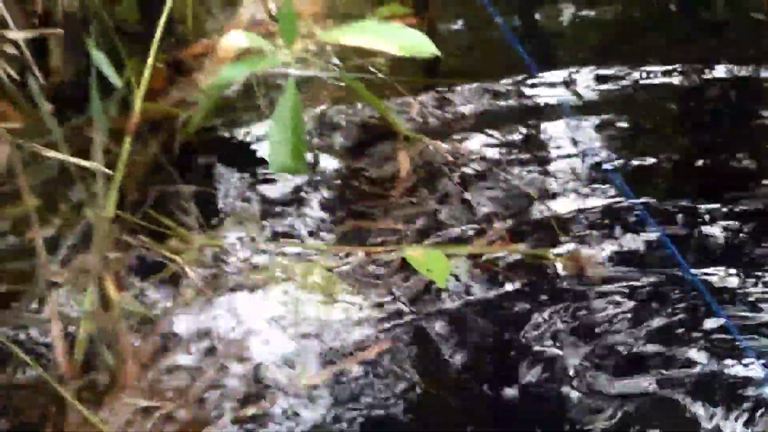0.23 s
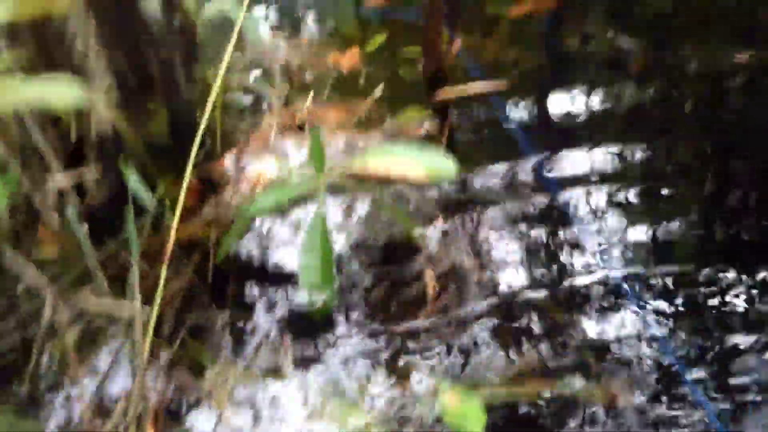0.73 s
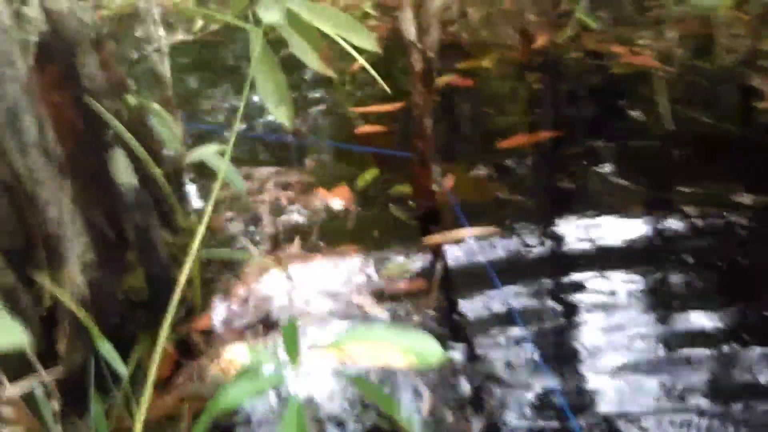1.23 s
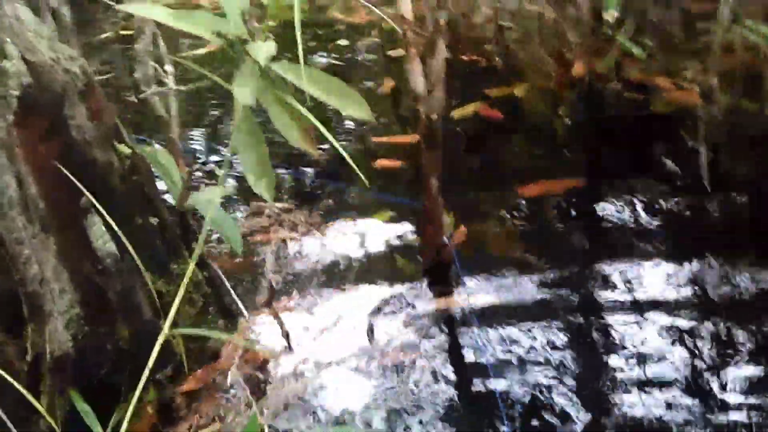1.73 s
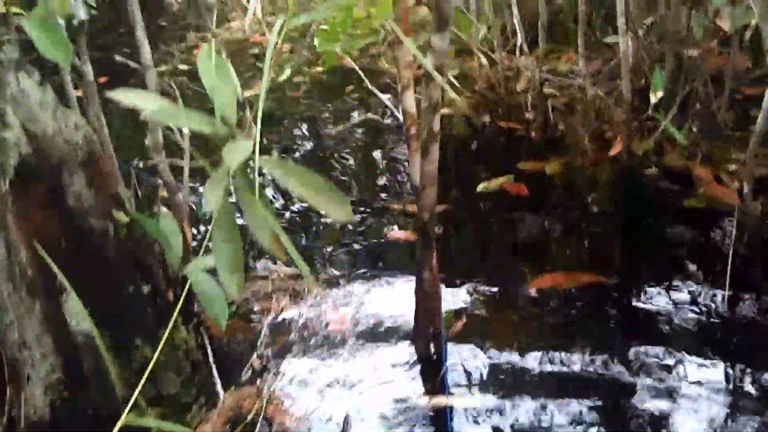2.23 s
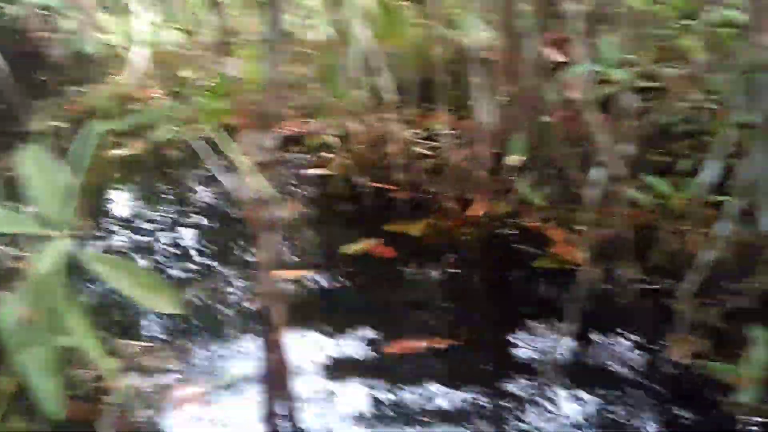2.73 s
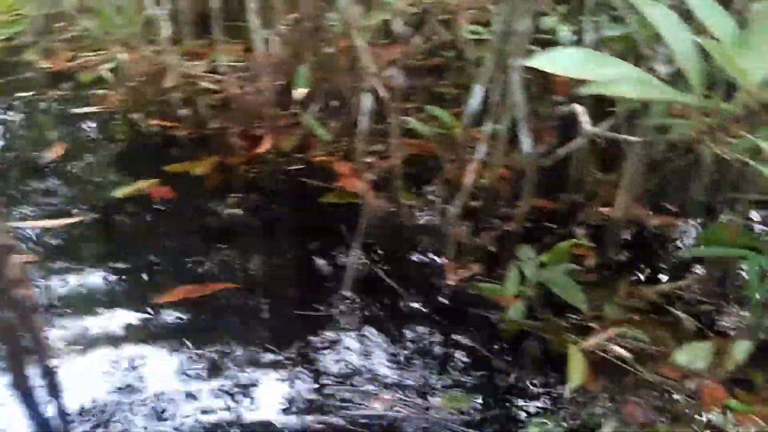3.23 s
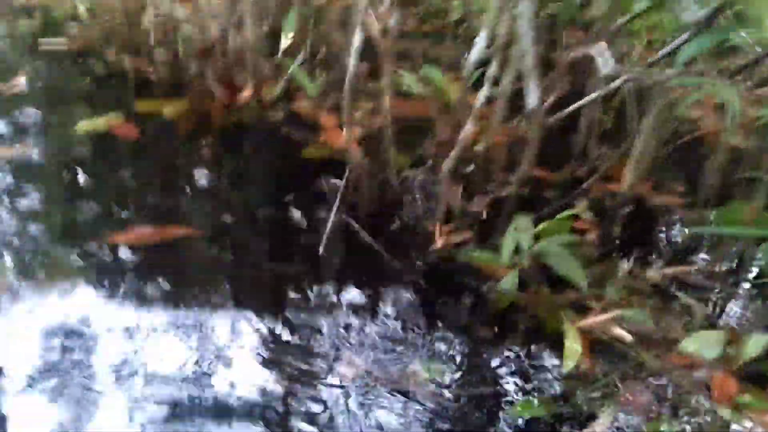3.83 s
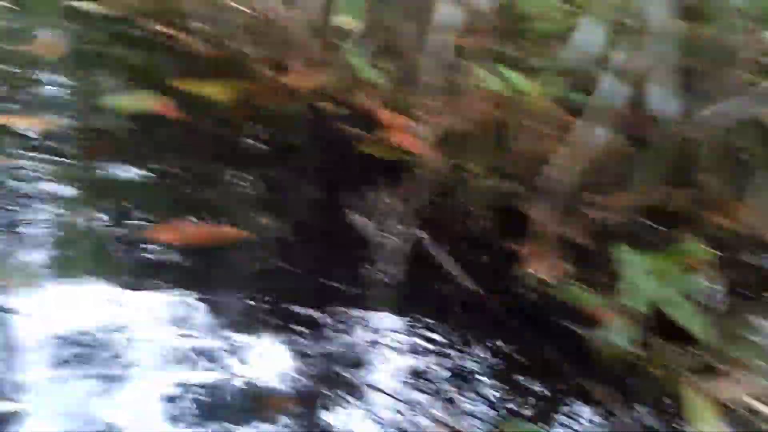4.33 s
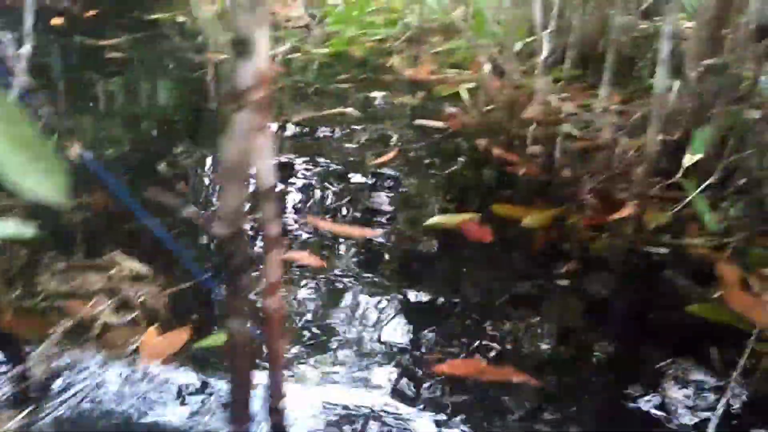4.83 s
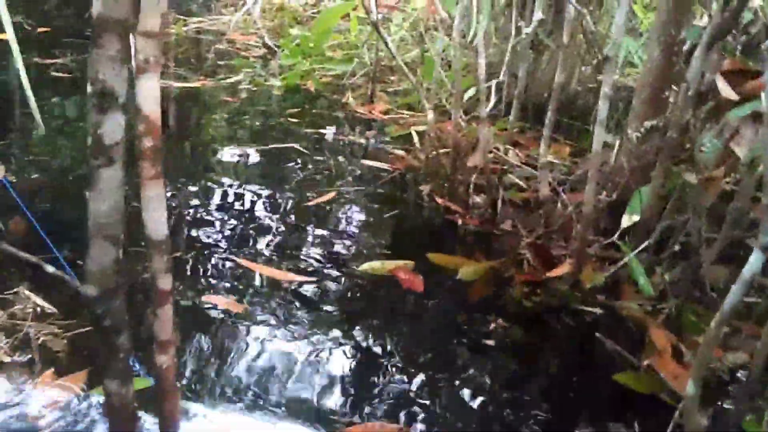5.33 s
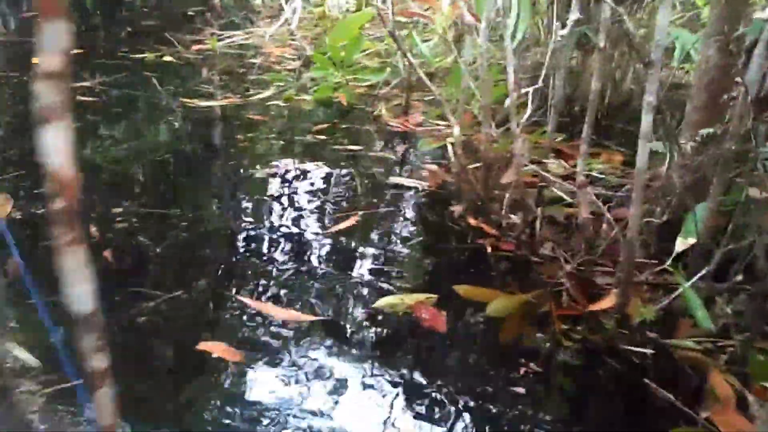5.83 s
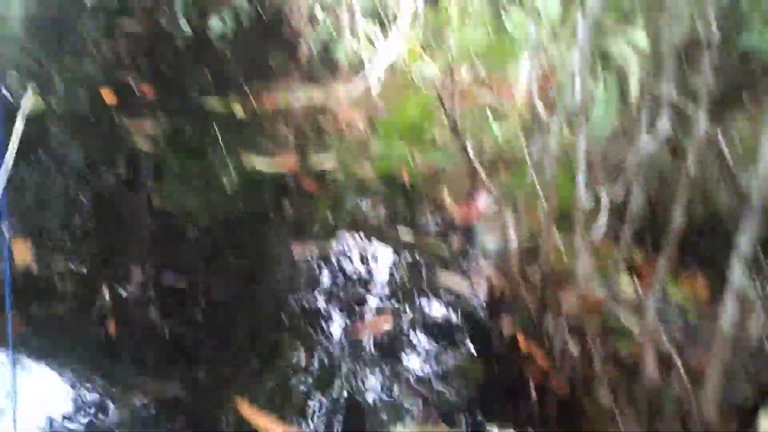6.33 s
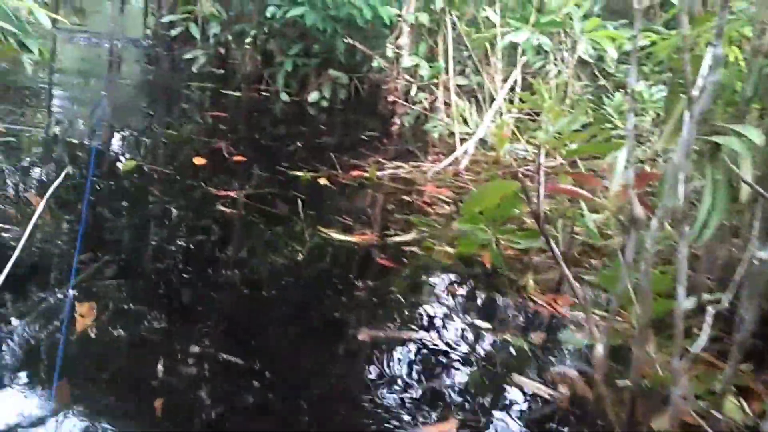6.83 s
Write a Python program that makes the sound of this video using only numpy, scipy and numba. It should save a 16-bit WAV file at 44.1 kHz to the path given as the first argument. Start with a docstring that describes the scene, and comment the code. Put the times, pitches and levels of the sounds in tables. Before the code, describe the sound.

Close splashing through shallow swamp water, with bubbly gurgles and fizzing spray, a near-silent pause around two seconds, then sharp slaps and more irregular sloshing.

```python
"""Something moves through shallow swamp water a step away, over a nearly silent swamp.
At first come ringing air pockets, then surges of bubbles and spray with slaps on the surface.
Near two seconds the water falls almost still; plunging slaps then break the pause and splashing runs on.
Air pockets are gliding, dying sines, bubble clouds sum thousands of them, and slaps are shaped noise.
Now and then wet reeds rustle as sliding noise bands; trunks and reeds scatter the sound a little."""
import sys
import numpy as np
from scipy import signal
from scipy.fft import rfft, irfft
from scipy.io import wavfile
from scipy.ndimage import uniform_filter1d
from numba import njit

SR = 44100
rng = np.random.default_rng(int(sys.argv[2]) if len(sys.argv) > 2 else 0)


def unload_wav(signal):
    """Save mono or channel-first audio to the path in sys.argv[1] as 16-bit WAV at rate SR, clipped to [-1, 1]."""
    wavfile.write(
        sys.argv[1],
        SR,
        np.round(np.clip(np.atleast_2d(signal).T, -1, 1) * 32767).astype(np.int16),
    )


N = 312220


def from_db(db):
    """Decibel law: gain is ten to the power of level over twenty."""
    return 10 ** (np.asarray(db) / 20)


def rms_one(x):
    """Normalisation: scale to a root mean square of 1."""
    return x / np.sqrt(np.mean(x ** 2) + 1e-20)


def in_time(rows):
    """Linear interpolation: each column of a time table at every sample."""
    s, *columns = np.transpose(rows)
    return [np.interp(np.arange(N) / SR, s, column) for column in columns]


def colour(x, spectrum):
    """Minimum-phase filtering: a folded cepstrum makes the (frequency [Hz], level [dB]) shape causal."""
    size = 8192
    hz, db = np.transpose(spectrum)
    grid = np.maximum(np.arange(size // 2 + 1) * SR / size, 1)
    gain = from_db(np.interp(np.log(grid), np.log(hz), db))
    cepstrum = irfft(np.log(gain))
    fold = np.r_[1, np.full(size // 2 - 1, 2), np.zeros(size // 2)]
    response = irfft(np.exp(rfft(cepstrum * fold)))[:size // 2]
    return signal.oaconvolve(np.atleast_2d(x), response[None], axes=-1)[:, :N]


def add(track, s, sound):
    """Superposition: mix a sound into a track from time s on."""
    start = int(np.clip(round(s * SR), 0, N - 1))
    track[..., start:start + sound.shape[-1]] += sound[..., :N - start]


def steady(x, window_s):
    """Short-time power normalisation: even out the slow level and keep the grain."""
    size = max(int(window_s * SR), 1)
    power = np.mean(x ** 2, axis=0)
    power = uniform_filter1d(uniform_filter1d(power, size), size)
    return x / np.sqrt(np.maximum(power, 1e-9))


# diffuse over common sound: (frequency [Hz], level ratio [dB])
DIFFUSENESS = [(60, -7), (400, -7), (1000, -7), (2500, 4), (5000, -2), (12000, 1)]


def wide_noise():
    """Interaural coherence: stereo noise more alike at both ears in the bass, more diffuse higher up."""
    diffuse = colour(rng.standard_normal((2, N)), DIFFUSENESS)
    even = [(hz, -10 * np.log10(1 + from_db(db) ** 2)) for hz, db in DIFFUSENESS]   # total stays flat
    return colour(rng.standard_normal(N) + diffuse, even)


# spectrum of the faint swamp air: (frequency [Hz], relative level [dB per Hz])
AIR_SPECTRUM = [(18, -57), (30, -6.5), (44, -1), (65, -8.5), (98, -19.5), (456, -43.5), (670, -8),
                (1010, -72.5), (1710, -17), (3450, -23), (3710, -27.5), (5720, -30.5), (6770, 2),
                (7450, -52), (9480, -23.5), (12300, -74), (20900, -120)]
AIR_DB = -76.5
# narrow high hisses, perhaps far insects: (frequency [Hz], width [Hz], level [dB])
HISS_BANDS = [(6900, 10, -78.5), (3850, 20, -91)]
# swell of the upper hiss: (time [s], level change [dB])
UPPER_HISS_SWELL = [(0, -5), (1.6, 1.5), (2.099, -8), (2.6, -1.5), (4.3, 7.5), (7.08, 7)]


def background():
    """Coloured and resonant noise: faint swamp air with two narrow bands of high hiss."""
    out = from_db(AIR_DB) * rms_one(colour(rng.standard_normal((2, N)), AIR_SPECTRUM))
    swells_db = (in_time(UPPER_HISS_SWELL)[0], 0)   # the lower band is steady
    for (hz, width, db), swell_db in zip(HISS_BANDS, swells_db):
        resonance = signal.iirpeak(hz, hz / width, fs=SR)
        hiss = signal.lfilter(*resonance, rng.standard_normal((2, N)))
        out += from_db(db + swell_db) * rms_one(hiss)
    return out


# low rumble as the microphone is moved about: (time [s], level [dB])
RUMBLE_LEVEL = [(0, -76), (2.5, -82.5), (2.75, -73), (3.3, -76), (3.9, -76.5), (4.4, -71), (4.65, -75),
                (5.1, -60), (5.35, -74), (5.8, -61), (6.2, -67.5), (6.5, -73.5), (6.78, -59), (7.08, -66)]
# its spectrum: (frequency [Hz], relative level [dB per Hz])
RUMBLE_SPECTRUM = [(20, -40.5), (45, -16), (75, -12.5), (120, -19), (200, -26), (400, -41.5)]


def rumble():
    """Amplitude modulation: dull low noise that swells while the microphone moves."""
    level_db, = in_time(RUMBLE_LEVEL)
    return from_db(level_db) * rms_one(colour(wide_noise(), RUMBLE_SPECTRUM))


# bright rustles, as of wet reeds being brushed:
# (start [s], length [s], level before the swell [dB], first frequency [Hz], last frequency [Hz])
BRUSHES = [(4.163, 0.066, -43.5, 3810, 3830), (4.521, 0.22, -42.5, 2180, 3220),
           (4.728, .1, -34.5, 3624, 4010), (4.779, 0.068, -37.5, 5010, 5240),
           (5.109, 0.062, -50, 7100, 6930), (5.547, 0.05, -43.5, 5780, 5770),
           (5.957, 0.064, -50, 5000, 4470), (6.795, 0.084, -36, 4970, 4870)]
BRUSH_WIDTH = 0.16   # bandwidth as a share of the first frequency


def rustle():
    """Quadrature modulation: each brush is a noise band that swells, slides in pitch and fades."""
    out, t = np.zeros((2, N)), np.arange(SR // 4) / SR
    for s, length, db, first_hz, last_hz in BRUSHES:
        gone = np.minimum(t / length, 1)
        turn = 2 * np.pi * np.cumsum(first_hz + (last_hz - first_hz) * gone) / SR
        narrow = signal.butter(2, BRUSH_WIDTH * first_hz / 2, fs=SR, output="sos")
        a, b = signal.sosfilt(narrow, rng.standard_normal((2, 2, len(t))))
        band = rms_one(a * np.cos(turn) + b * np.sin(turn))
        add(out, s, from_db(db) * np.sin(np.pi * gone ** 0.51) * band)
    return out


# each push through the water:
# (start [s], swell [s], hold [s], spray level [dB], gurgle level [dB], slosh level [dB])
SURGES = [(0.103, 0.063, 0.01, -56.5, -74, -85), (0.197, 0.046, 0.011, -50.5, -70.5, -85),
          (0.293, 0.036, 0.076, -42.5, -46.5, -91.5), (0.4, 0.066, 0.18, -35.5, -36, -81),
          (0.629, 0.069, 0.06, -38.5, -40, -86.5), (0.749, .03, 0.14, -37, -48, -77),
          (0.964, 0.043, 0.17, -40.5, -45, -78.5), (1.366, 0.023, 0.078, -59, -60.5, -78.5),
          (1.648, 0.01, 0.086, -66, -60, -75.5), (2.586, .04, 0.039, -59.5, -49.5, -69),
          (2.692, 0.0085, 0.06, -52, -51, -45.5), (2.764, 0.0046, 0.031, -43, -50, -45.5),
          (2.829, 0.086, 0.0095, -45, -67, -80.5), (2.954, 0.036, 0.0039, -47, -66, -53.5),
          (3.096, 0.014, 0.0073, -43, -60, -43.5), (3.17, 0.036, 0.01, -41.5, -60.5, -59),
          (3.271, 0.024, 0.042, -36.5, -44, -75.5), (3.473, 0.049, 0.019, -54.5, -45, -69),
          (3.626, 0.024, 0.014, -45.5, -49.5, -60.5), (3.699, 0.0075, 0.012, -50.5, -52, -61),
          (3.838, 0.039, 0.058, -68.5, -55, -75), (4.127, 0.068, .025, -44.5, -51, -57),
          (4.41, 0.083, 0.23, -42, -49.5, -63.5), (4.532, 0.084, 0.03, -55.5, -39.5, -46.5),
          (4.69, 0.067, 0.052, -41.5, -49, -51.5), (4.876, 0.052, 0.092, -43, -50.5, -53.5),
          (5.352, 0.074, 0.06, -64, -64.5, -84), (5.549, 0.0062, 0.0098, -43.5, -49.5, -65),
          (5.65, 0.067, 0.011, -55.5, -43.5, -65.5), (5.776, .028, 0.013, -41, -48.5, -60.5),
          (5.933, 0.07, 0.01, -54.5, -52, -64), (6.077, 0.019, 0.0084, -56, -56, -59.5),
          (6.169, 0.0027, 0.0025, -54.5, -58.5, -59), (6.277, 0.016, 0.013, -51.5, -60.5, -80.5),
          (6.573, 0.098, 0.057, -51, -45.5, -83), (6.729, 0.019, 0.027, -45.5, -44.5, -50),
          (6.751, 0.089, 0.02, -42, -39.5, -56.5), (6.924, .05, 0.032, -39.5, -47.5, -55),
          (7.019, 0.038, .05, -34.5, -36.5, -58)]
SWELL_DB = 18   # climb during the swell
# for spray, gurgle, slosh: rate of collapse, then the trickle left behind, and the water's lowest level
COLLAPSE_DB_PER_S = (208, 233.5, 329.5)
TRICKLE_DB, TRICKLE_DB_PER_S = (-11.5, -11, -13.5), 39.5
CALM_DB = (-84, -91.5, -88.5)


def stirring():
    """Power summation: levels [dB] of surges that swell, hold, collapse and trickle away."""
    t = np.arange(0, N / SR + .002, .001)
    collapse, trickle, calm = (np.array(c)[:, None] for c in (COLLAPSE_DB_PER_S, TRICKLE_DB, CALM_DB))
    power = from_db(calm) ** 2
    for start, swell, hold, *levels in SURGES:
        rising = SWELL_DB * np.minimum((t - start) / swell - 1, 0)
        after = np.maximum(t - start - swell - hold, 0)
        falling = np.maximum(-collapse * after, trickle - TRICKLE_DB_PER_S * after)
        power = power + from_db(np.array(levels)[:, None] + rising + falling) ** 2
    return in_time(np.column_stack([t, *(10 * np.log10(power))]))


@njit
def ring_bubbles(starts, steps, lengths, sizes, rises, total):
    """Damped oscillation: a sum of dying sines, each rising in pitch as its bubble nears the surface."""
    out = np.zeros(total)
    for k in range(len(starts)):
        height, fade = sizes[k], np.exp(-np.log(1000) / lengths[k])   # 60 dB over the length
        for i in range(min(int(lengths[k]), total - starts[k])):
            swell = min(1., 16 * i / lengths[k])   # the ring builds up over the first sixteenth
            phase = steps[k] * i * (1 + rises[k] * i / lengths[k] / 2)
            out[starts[k] + i] += swell * height * np.sin(phase)
            height *= fade
    return out


BRISK_DB, THINNING = -42, .7   # below a brisk stir the birth rate falls as the level to this power
CALM_RING = .25   # bubbles ring longer in calm water: cycles fall as the birth rate to this power
SPREAD_MS, SPREAD_DB = .085, 11.5   # scatter of lead and balance: bubbles lie all over the splash
SETTLED_DB, SETTLING_DB = -65, 21   # below this bubbles melt into the wash, wholly after so many dB more


def cloud(kind, level_db, spectrum, low_hz, high_hz, rise, window_s):
    """Random superposition: bubbles on a smooth wash; gentle stirring makes few, hard stirring many."""
    per_s, spread_db, cycles, wash = kind
    stir = np.clip(from_db(THINNING * (level_db - BRISK_DB)), .02, 1)
    draws = rng.random((N // 4, 8))[:int(per_s * N / SR)]
    born = draws[draws[:, 1] < stir[(draws[:, 0] * N).astype(int)]]
    when, _, pitch, size, damping, glide, lead, side = born.T
    hz = low_hz * (high_hz / low_hz) ** pitch
    sizes = from_db(spread_db * np.minimum(-np.log(1 - size), 4)) * np.sqrt(hz / low_hz)
    calmness = stir[(when * N).astype(int)] ** -CALM_RING
    lengths = cycles * calmness * 2 ** (3 * (damping - .5)) * SR / hz
    steps = 2 * np.pi * hz / SR
    ears = []
    for ear in (1, -1):
        starts = when * N + ear * np.sqrt(3) * (lead - .5) * SPREAD_MS * SR / 1000
        starts = np.clip(starts, 0, N - 1).astype(np.int64)
        heights = sizes * from_db(ear * np.sqrt(3) * (side - .5) * SPREAD_DB)
        ears.append(ring_bubbles(starts, steps, lengths, heights, rise * glide, N))
    rings = rms_one(colour(np.array(ears), spectrum) / np.sqrt(stir))   # make up for thinner births
    wash = np.clip(wash + np.maximum(SETTLED_DB - level_db, 0) / SETTLING_DB, 0, 1)
    smooth = rms_one(colour(wide_noise(), spectrum))
    water = np.sqrt(1 - wash) * rings + np.sqrt(wash) * smooth
    return from_db(level_db) * steady(water, window_s)


CLUMPS_PER_S, CLUMP_DB = 130, 1.2   # rate of the clumps, spread of their levels


def clumps():
    """Random modulation: quick swings in dB as the thrown water tumbles back in clumps."""
    knots = np.arange(N) * CLUMPS_PER_S / SR
    swings = rng.standard_normal(int(knots[-1]) + 2)
    return CLUMP_DB * np.interp(knots, np.arange(len(swings)), swings)


# spectra of the large, middle and small bubbles: (frequency [Hz], relative level [dB per Hz])
SLOSH_SPECTRUM = [(25, -42), (50, -19.5), (80, 2.5), (130, -0.5), (230, -1), (320, 1), (480, 1),
                  (900, -48.5)]
GURGLE_SPECTRUM = [(200, -31), (350, -20), (480, -2), (750, 6), (1150, 11.5), (1600, 9), (2100, 5.5),
                   (3500, -31)]
SPRAY_SPECTRUM = [(900, -57.5), (1500, -6), (2000, -3), (2800, 2), (3900, -0.5), (5200, -0.5), (6300, -3),
                  (7000, -10.5), (7900, -26), (9400, -24), (10500, -49.5), (15000, -54)]
# bubble clouds: (bubbles tried per s, spread of sizes [dB], cycles to die away, share of smooth wash)
BIG, MIDDLE, FINE = (200, 3.5, 7, .3), (1500, 3.6, 24, .12), (7000, 3.7, 33, .17)


def churn(spray_db, gurgle_db, slosh_db):
    """Bubble resonance falls with size: large pockets slosh, middling ones gurgle, the finest fizz."""
    slosh = cloud(BIG, slosh_db, SLOSH_SPECTRUM, 78, 470, rise=0.23, window_s=0.14)
    gurgle = cloud(MIDDLE, gurgle_db, GURGLE_SPECTRUM, 345.4, 2017, rise=0.38, window_s=0.091)
    spray = cloud(FINE, spray_db, SPRAY_SPECTRUM, 1600, 7200, rise=.09, window_s=.03)
    return slosh + (gurgle + spray) * from_db(clumps())


# slaps on the surface: (time [s], relative level [dB], depth [0 flick of spray, .5 flat smack, 1 plunge])
SLAPS = [(0.396, -34, 0.22), (0.484, -40, 0.15), (0.9082, -33, 0.13), (1.013, -37, 0.18), (1.025, -42.5, 0),
         (1.0608, -38, 0.36), (1.08, -44.5, 0.027), (1.16, -34, 0.12), (1.17, -47, 0.22),
         (1.205, -40, 0.24), (1.401, -44, 0.26), (1.698, -54, 0.22), (1.732, -56, 0.19),
         (1.611, -45.5, 0.39), (2.222, -69.5, 0.15), (2.6848, -27.5, 0.84), (2.713, -27, 0.95),
         (2.7673, -34, 0.28), (2.952, -52, 0.9), (3.105, -39, 0.79), (3.253, -38, 0.11),
         (3.3221, -33.5, 0.58), (3.336, -32.5, 0.3), (3.502, -38.5, 0.76), (3.524, -43.5, 0.52),
         (3.53, -49, 0.51), (3.5568, -38.5, 0.34), (3.6142, -33.5, 0.6), (3.624, -52, 0.5),
         (3.638, -46, .55), (3.663, -46, 0.14), (3.956, -45, 0.24), (4.021, -48, 0.27), (4.149, -45, 0.9),
         (4.3042, -50.5, 0.094), (4.4398, -39, 0.19), (4.46, -51, 0), (4.4691, -35, 0.15),
         (4.494, -40.5, 0.17), (4.505, -42, 0.21), (4.645, -34.5, 0.25), (4.657, -36, 0.93),
         (4.8016, -37, 0.27), (4.917, -40, 0.22), (5.227, -41.5, 0.19), (5.6437, -40.5, 0.5),
         (5.707, -51, 0.39), (5.7986, -44, 0), (5.962, -42, 0.27), (6.176, -44, 0.86), (6.26, -49.5, 0.14),
         (6.295, -38.5, 0.36), (6.3062, -31, 0.35), (6.802, -39, 0.077), (7.028, -34.5, 0.52)]
# what a flick, a flat smack and a plunge set off, relative to the slap
SLAP_THUMP_DB, SLAP_SMACK_DB, SLAP_SPRAY_DB = (-44, -44.5, -1), (-17.5, 1.5, -12.5), (4.5, -19, -15)


def slaps(crack_s, spatter_s, spatter_db, trim_db):
    """Impact noise: a sharp crack as the surface closes, then a brief spatter; depth sets the colour."""
    t = np.arange(SR // 16) / SR
    shape = np.exp(-t / crack_s) + from_db(spatter_db) * np.exp(-t / spatter_s)
    shape /= np.sqrt(np.sum(shape ** 2) / (.008 * SR))   # levels are rms over 8 ms
    # As listed, the thump column peaks for a flick-to-plunge depth of 1
    parts = ((SLOSH_SPECTRUM, SLAP_THUMP_DB), (GURGLE_SPECTRUM, SLAP_SMACK_DB),
             (SPRAY_SPECTRUM, SLAP_SPRAY_DB))
    out, noise = 0, wide_noise()
    for spectrum, by_depth in parts:
        force = np.zeros(N)
        for s, db, depth in SLAPS:
            part_db = np.interp(depth, (0, .5, 1), by_depth)
            add(force, s, from_db(db + trim_db + part_db) * shape)
        out = out + colour(force * noise, spectrum) / np.std(colour(noise[:, :SR], spectrum))
    return out


STRAY_PER_S, STRAY_LOW_HZ, STRAY_HIGH_HZ = 18, 566, 3040
STRAY_OVER_DB, STRAY_TOP_DB, STRAY_SPREAD_DB = 16.5, -48.5, 8   # over the gurgle, ceiling, scatter
STRAY_STOP_DB = -70.5   # none come up once the gurgle is below this
STRAY_CYCLES, STRAY_RISE_PER_S = 18, 12   # mean cycles of ringing, mean pitch rise as share per s


def strays(gurgle_db):
    """Random arrivals: stray pockets come up wherever the water is stirred; rows as in POCKETS."""
    when, pitch, size, damping, glide = rng.random((1000, 5))[:int(STRAY_PER_S * N / SR)].T
    hz = STRAY_LOW_HZ * (STRAY_HIGH_HZ / STRAY_LOW_HZ) ** pitch
    stir_db = gurgle_db[(when * N).astype(int)]
    db = np.minimum(stir_db + STRAY_OVER_DB, STRAY_TOP_DB) + STRAY_SPREAD_DB * (2 * size - 1)
    t60 = STRAY_CYCLES * (.5 + damping) / hz
    rows = np.column_stack([when * N / SR, hz, db, t60, STRAY_RISE_PER_S * 2 * glide])
    return rows[stir_db > STRAY_STOP_DB]


# single air pockets:
# (time [s], first pitch [Hz], relative peak level [dB], 60 dB decay [s], first pitch rise [share per s])
POCKETS = [(0.075, 2000, -35, 0.0085, 0), (0.0746, 2780, -31.5, 0.0045, -3), (0.075, 3870, -41, 0.013, -7),
           (0.087, 1895, -35, 0.03, 28), (0.105, 1143, -51, 0.13, 10.5), (0.117, 1836, -34, 0.019, 6),
           (0.161, 2950, -38, 0.034, 1.5), (0.206, 1070, -47.5, 0.1, -3.5), (0.243, 5890, -38.5, 0.014, -2),
           (0.257, 2250, -45.5, 0.037, 5), (0.305, 2920, -34, 0.012, -4), (0.309, 1780, -33, 0.023, 55),
           (0.394, 4850, -29, 0.025, -2), (0.412, 506, -41, 0.28, 2), (0.4404, 556, -22, 0.072, 20),
           (0.447, 419, -31.5, 0.33, 9.5), (0.467, 796, -28, 0.076, 8), (0.4827, 900, -28, 0.051, 8),
           (0.493, 1720, -24, 0.0099, 10), (0.499, 358, -27, 0.59, 11), (0.524, 423.5, -29, 0.33, 24),
           (0.5448, 642, -25.5, 0.029, 11), (0.583, 543, -27.5, 0.18, 15.5), (0.633, 676, -23, 0.037, 6),
           (0.7349, 664, -26, 0.067, 6.5), (0.736, 1440, -19, 0.0074, -7.5),
           (0.849, 3070, -22.5, 0.013, -1), (0.86, 2520, -25, 0.012, -7), (0.908, 2320, -18.5, 0.016, 14),
           (0.983, 1000, -34, 0.018, 16), (1.09, 802, -35.5, 0.092, 7.5), (1.045, 1930, -18.5, 0.014, -8),
           (1.127, 1027, -31, 0.06, 23), (1.157, 1640, -11.5, 0.0072, 21), (1.159, 1056, -26.5, 0.033, 1),
           (1.169, 2170, -17, 0.0064, 1.5), (1.2, 535, -37, 0.023, 7), (1.2029, 1444, -17.5, 0.025, 43),
           (1.264, 784, -36, 0.075, 3.5), (1.324, 2200, -27, 0.0084, 0), (1.353, 5860, -26, 0.0023, 9),
           (1.532, 543, -48, 0.23, 9.5), (1.548, 2930, -46, 0.023, 3), (1.563, 789, -38.5, 0.055, 11.5),
           (1.6133, 872, -34.5, 0.057, 31), (1.678, 1255, -42.5, 0.057, 12.5),
           (1.682, 1834, -44, 0.055, 9.5), (1.802, 642, -55, 0.12, 3.5), (1.86, 579, -58, 0.14, -3.5),
           (1.959, 2340, -53, 0.013, -10), (2.495, 1550, -40.5, 0.051, 10),
           (2.564, 1880, -37.5, 0.0083, -12), (2.584, 2040, -45, 0.027, 2), (2.611, 1320, -35, 0.031, -5),
           (2.625, 2770, -36, 0.011, -1), (2.6857, 347, -16.5, 0.0054, 4), (2.7136, 219, -18, 0.063, 13),
           (2.728, 1220, -28, 0.021, 0), (2.773, 515, -38.5, 0.18, 6.5), (2.813, 629, -36.5, 0.096, 16.5),
           (2.858, 1095, -39.5, 0.1, 16.5), (2.92, 1070, -33, 0.021, 16), (2.981, 1330, -34, 0.022, 15),
           (2.99, 195, -35, 0.045, 8), (3.1064, 605, -21.5, 0.037, 6), (3.111, 230, -30, 0.028, 19),
           (3.248, 192, -24.5, 0.033, 17.5), (3.256, 1160, -35.5, 0.042, 15), (3.284, 3100, -26, 0.011, 8),
           (3.319, 1050, -21, 0.016, 0), (3.324, 595, -23, 0.013, -2), (3.335, 1033, -28, 0.094, -0.5),
           (3.53, 874, -29, 0.013, 29), (3.551, 1210, -26.5, 0.015, -4), (3.56, 2090, -12.5, 0.0036, 7),
           (3.603, 3340, -28, 0.011, 13), (3.638, 244, -31.5, 0.058, -6), (3.6532, 1520, -28.5, 0.018, 14),
           (3.822, 1270, -38, 0.017, -1), (3.858, 3620, -38, 0.044, 5), (3.868, 2530, -38, 0.018, 10),
           (3.909, 1132, -34, 0.14, 23.5), (4.027, 700, -50.5, 0.078, 0), (4.119, 1486, -45.5, 0.072, -5.5),
           (4.352, 1225, -39, 0.011, 7), (4.548, 2210, -25, 0.0047, 8), (4.585, 402, -41, 0.11, 3),
           (4.614, 342.6, -30, 0.17, 0), (4.655, 367, -19.5, 0.01, 4), (4.792, 105.5, -37.5, 0.31, 3),
           (4.919, 1450, -25, 0.013, -5), (4.918, 2720, -16.5, 0.0048, -1), (5.12, 2900, -37, 0.099, 8),
           (5.124, 4800, -38.5, 0.026, -5), (5.219, 2840, -29, 0.016, 10), (5.226, 4200, -30.5, 0.045, 2.5),
           (5.288, 2350, -45.5, 0.031, 7), (5.383, 1870, -45.5, 0.028, 3), (5.393, 1476, -47, 0.021, 9),
           (5.442, 1500, -42.5, 0.022, -4), (5.479, 1103, -48.5, 0.21, 2), (5.503, 1560, -42, 0.034, -1),
           (5.552, 990, -21, 0.045, 15), (5.556, 1703, -30, .045, -9), (5.555, 481.5, -23.5, 0.14, -2.5),
           (5.606, 3170, -38.5, 0.031, -3), (5.616, 1630, -47, .06, 33.5), (5.641, 1677, -13, 0.015, -6),
           (5.69, 613, -38, 0.2, 7), (5.73, 1123, -45, 0.3, 8), (5.783, 4600, -34.5, 0.015, 8),
           (5.784, 1865, -25.5, 0.035, -3.5), (5.798, 555, -27, 0.19, 2.5), (5.817, 2140, -19.5, 0.017, 9),
           (5.827, 4180, -19, 0.011, 1), (5.876, 1823, -23.5, 0.03, 0.5), (5.8845, 594, -33.5, 0.022, 3),
           (5.915, 600, -36.5, 0.053, 0), (5.999, 1404, -32, 0.098, 3), (6.085, 1076, -30, 0.025, 17),
           (6.1096, 5000, -25.5, 0.0022, -3), (6.168, 1596, -42, 0.036, 29), (6.1783, 2220, -25, 0.034, 4),
           (6.2921, 1090, -24, 0.055, -9.5), (6.3086, 783, -14, 0.092, 0.5), (6.339, 2470, -42, 0.019, 0),
           (6.365, 2930, -34.5, 0.0089, 2), (6.475, 1597, -29.5, 0.13, 42), (6.4827, 4480, -28, 0.013, -2),
           (6.533, 2810, -29, 0.012, -17), (6.605, 1440, -44, 0.2, 20), (6.625, 2800, -38, 0.023, -8),
           (6.634, 1734, -37, 0.099, -23), (6.6493, 902, -27, 0.088, 17.5), (6.657, 1180, -31, 0.047, 9.5),
           (6.675, 2450, -31, 0.027, 12), (6.692, 4800, -43, 0.17, 2.5), (6.7, 2540, -29, 0.015, -3),
           (6.726, 723, -25.5, 0.13, 4.5), (6.753, 114, -38, 0.17, -6), (6.763, 1460, -30, 0.014, 0),
           (6.796, 914, -33, 0.11, 5), (6.815, 4520, -26.5, 0.015, -12), (6.842, 1404, -31.5, 0.14, 4.5),
           (6.949, 2510, -19.5, 0.011, 5), (6.973, 2570, -24, .009, 12), (6.981, 1955, -27, .04, -0.5),
           (6.9861, 1195, -31, 0.1, 5), (6.996, 2820, -22, 0.0086, 11), (7.023, 1005, -29, 0.24, 8),
           (7.028, 2500, -18, 0.027, 10), (7.0623, 902, -24, 0.045, 1)]
# loud pockets above this level shed weaker ones, within this time, up to this multiple of their pitch
SHED_ABOVE_DB, SHED_DB, SHED_WITHIN_S, SHED_PITCH = -33, -15, .045, 2.8


def daughters(count):
    """Bubble fission: smaller, higher pockets pinched off loud middling ones; rows as in POCKETS."""
    rows = []
    for (s, hz, db, _, _), draws in zip(POCKETS, rng.random((len(POCKETS), count, 3))):
        if db > SHED_ABOVE_DB and STRAY_LOW_HZ < hz < STRAY_HIGH_HZ:
            for delay, size, glide in draws:
                small_hz = hz * SHED_PITCH ** size
                t60, rise = STRAY_CYCLES / small_hz, STRAY_RISE_PER_S * 2 * glide
                rows.append((s + SHED_WITHIN_S * delay, small_hz, db + SHED_DB, t60, rise))
    return rows


BURST_RISE = 0.95   # a pocket bursts at the surface once its pitch has risen by this share
STRUCK_WITHIN_S = .003   # a pocket this near a slap is trapped by it and rings almost at once
SWELL_S = 0.0038   # longest swell of a free pocket, which wells up softly
STRUCK_SWELL_S, STRUCK_SWELL_CYCLES = .0003, .3


def plops(rows, trim_db, linger_db, linger_cycles, climb_s, wobble, spread_db):
    """Bubble resonance: a pocket swells, climbs unevenly in pitch and dies; a faint ring lingers."""
    out, t = np.zeros((2, N)), np.arange(SR // 5) / SR
    chance = rng.standard_normal((600, 80))
    for (s, hz, db, t60, rise), (side, *jitter) in zip(rows, chance):
        struck = any(abs(s - slap[0]) < STRUCK_WITHIN_S for slap in SLAPS)
        swell = STRUCK_SWELL_S + STRUCK_SWELL_CYCLES / hz if struck else min(SWELL_S, t60 / 6)
        ring = from_db(-60 * t / t60)
        linger = from_db(linger_db - 60 * t * hz / linger_cycles)
        shape = (1 - np.exp(-(t / swell) ** 2)) * (ring + linger)
        climb = rise * climb_s * (1 - np.exp(-t / climb_s))   # levels off over climb_s
        shape = shape / (1 + (climb / BURST_RISE) ** 12)
        unrest = np.interp(t, np.linspace(0, t[-1], len(jitter)), jitter)
        pitch = hz * (1 + climb) * (1 + wobble * unrest)
        tone = np.sin(2 * np.pi * np.cumsum(pitch) / SR)
        ears = rms_one(from_db([[side * spread_db / 2], [-side * spread_db / 2]]))
        add(out, s, ears * from_db(db + trim_db) * shape / shape.max() * tone)
    return out


def echoes(x, t60, delay_s):
    """Exponential reverberation: a dying swarm of reflections, different at each ear."""
    t = np.arange(SR // 2) / SR
    response = rng.standard_normal((2, len(t))) * from_db(-60 * t / t60) * (t > delay_s)
    response /= np.sqrt(np.sum(response ** 2, axis=1, keepdims=True))
    return signal.oaconvolve(x, response, axes=-1)[:, :N]


# direction of the splashing: (time [s], lead of the left ear [ms], left over right [dB])
BEARING = [(0, 0.21, 10), (1.9, 0.26, 8.5), (2.4, 0.21, 4.5), (2.7, -0.27, 17.5), (2.9, -0.2, 7),
           (3.11, -0.14, 19.5), (3.24, -0.22, 3.5), (4.7, -0.024, 5), (5.5, -0.15, 6), (6.1, -0.16, 2),
           (6.3, -0.067, 4.5), (6.6, -0.2, 5.5), (7.08, -0.19, 2.5)]
# near echoes come off the nearest trunks, too thin to reflect the bass
SCATTER_DB, SCATTER_ABOVE_HZ, SCATTER_T60_S = -6, 2100, 0.032
FAR_DB, FAR_T60_S = -17.5, 0.26


def scene():
    """Interaural time and level differences: splashing from its bearing, with near and far echoes."""
    lead_ms, pan_db = in_time(BEARING)
    ears = from_db(np.array([pan_db, -pan_db]) / 2)
    ears = ears / np.sqrt(np.mean(ears ** 2, axis=0))
    spray_db, gurgle_db, slosh_db = stirring()
    rows = [*POCKETS, *strays(gurgle_db), *daughters(count=2)]
    pockets = plops(rows, trim_db=-3.5, linger_db=-49, linger_cycles=140, climb_s=.075,
                    wobble=0.037, spread_db=5.5)
    water = pockets + churn(spray_db, gurgle_db, slosh_db)
    water = water + slaps(crack_s=0.0004, spatter_s=0.006, spatter_db=-1, trim_db=2.8)
    water = (water + rustle()) * ears
    index, lead = np.arange(N), np.round(lead_ms * SR / 1000).astype(int)
    direct = np.array([water[0], water[1, np.clip(index - lead, 0, N - 1)]])
    thin = signal.butter(1, SCATTER_ABOVE_HZ, "high", fs=SR)
    scattered = signal.lfilter(*thin, pockets * ears)
    near = from_db(SCATTER_DB) * echoes(scattered, SCATTER_T60_S, delay_s=0.0048)
    far = from_db(FAR_DB) * echoes(water, FAR_T60_S, delay_s=0.0068)
    return direct + near + far + background() + rumble()


TREBLE_EDGE_HZ, CUTOFF_HZ = 9640, 15100


def record(dry):
    """Low-pass filtering: the treble drops by a steep step, and the top is cut."""
    step = signal.ellip(6, .2, 17, TREBLE_EDGE_HZ, fs=SR, output="sos")
    cut = signal.ellip(10, .1, 70, CUTOFF_HZ, fs=SR, output="sos")
    return signal.sosfilt(cut, signal.sosfilt(step, dry))


dry = scene()
out = record(dry)
unload_wav(out)
```